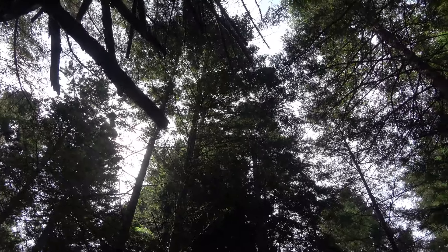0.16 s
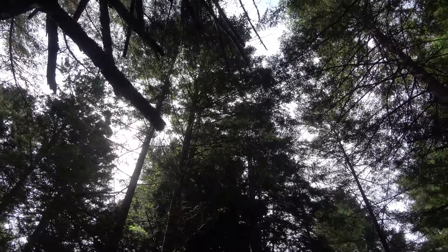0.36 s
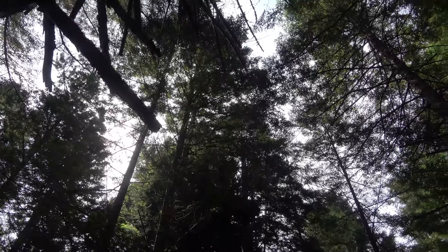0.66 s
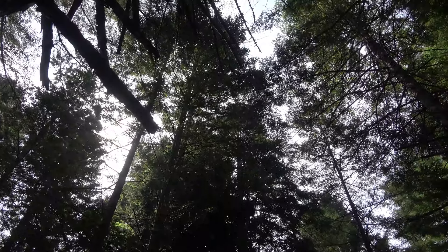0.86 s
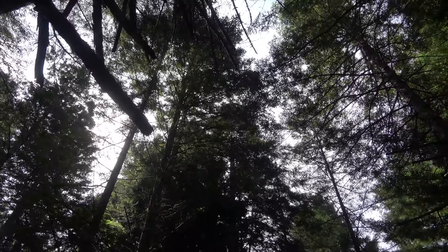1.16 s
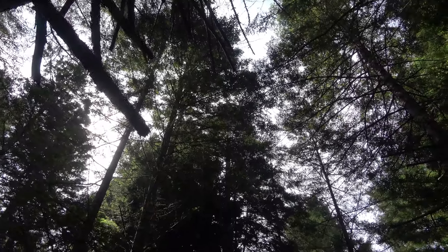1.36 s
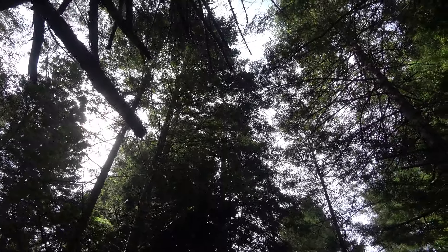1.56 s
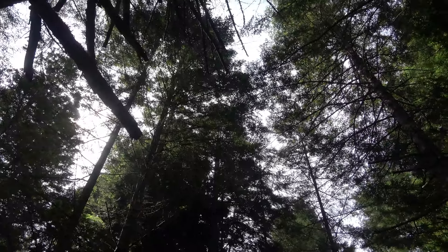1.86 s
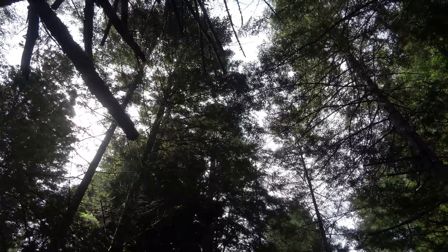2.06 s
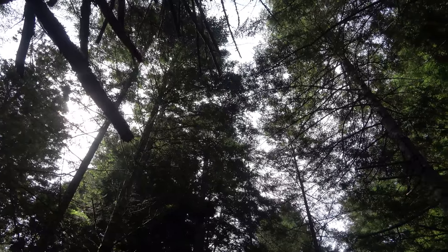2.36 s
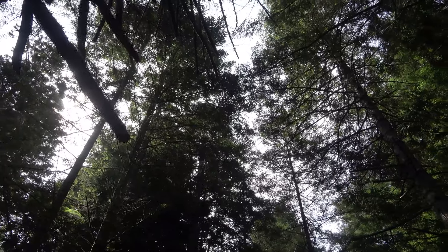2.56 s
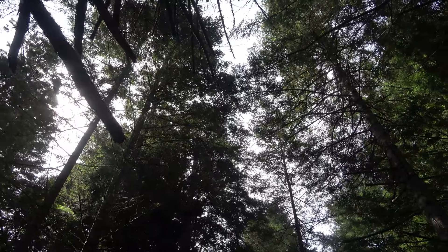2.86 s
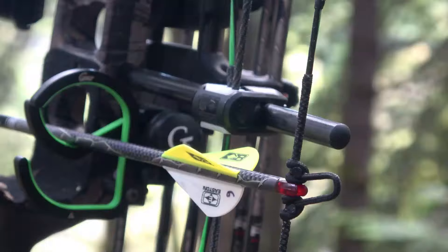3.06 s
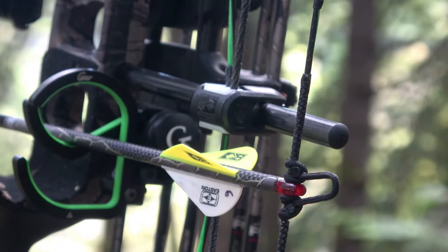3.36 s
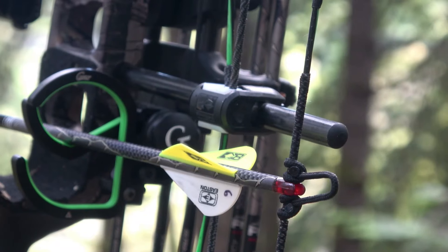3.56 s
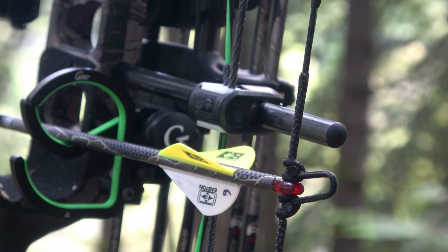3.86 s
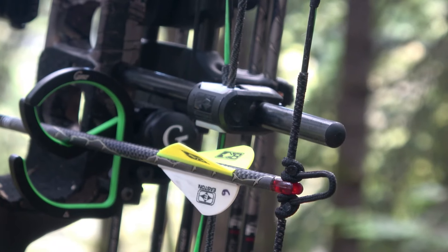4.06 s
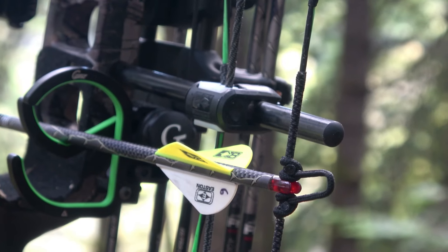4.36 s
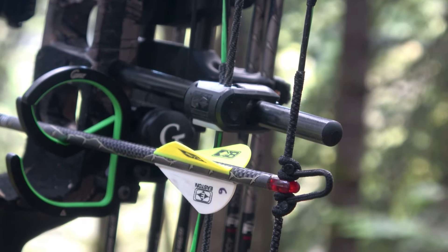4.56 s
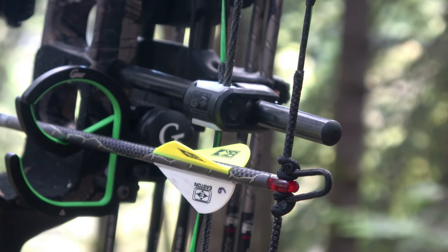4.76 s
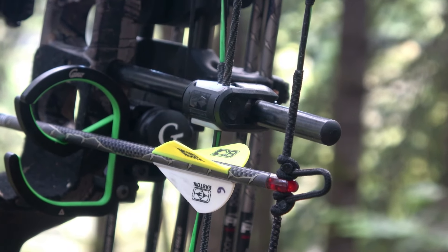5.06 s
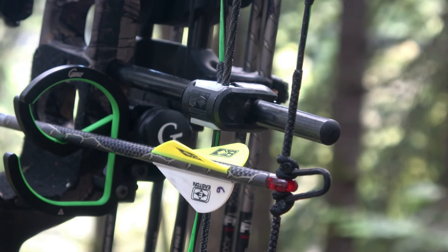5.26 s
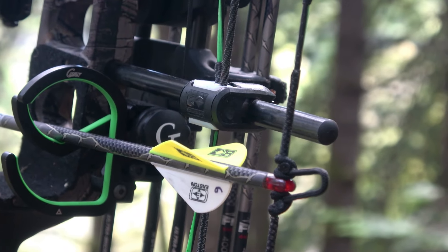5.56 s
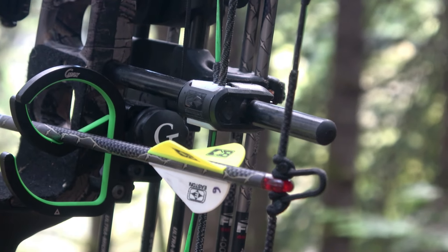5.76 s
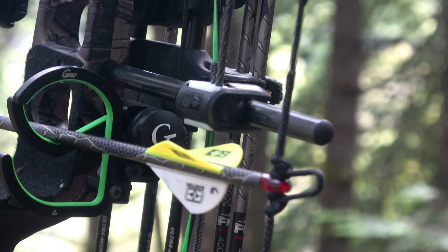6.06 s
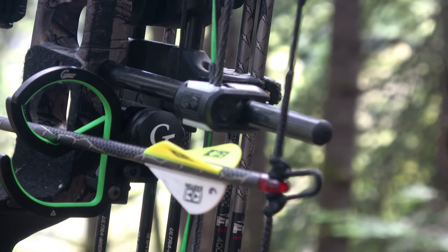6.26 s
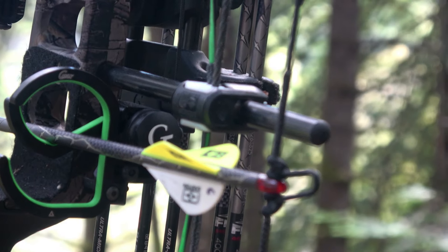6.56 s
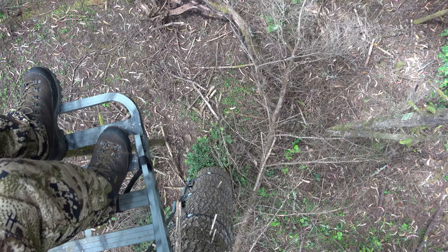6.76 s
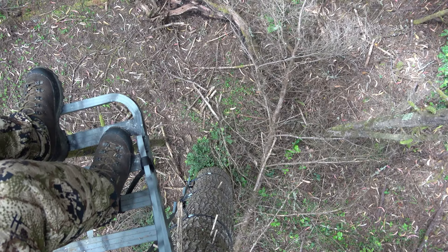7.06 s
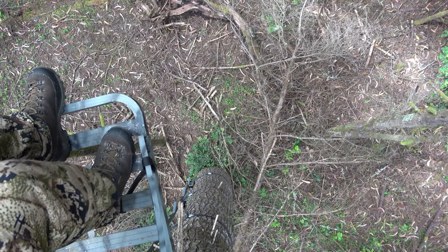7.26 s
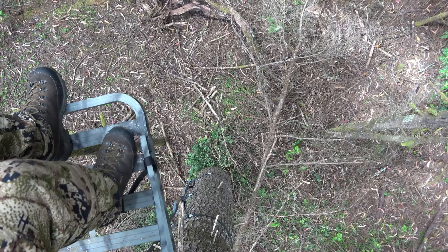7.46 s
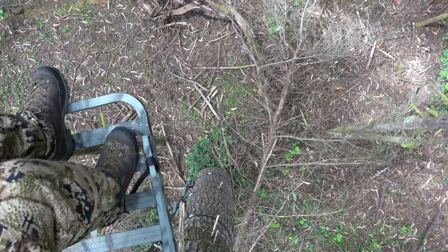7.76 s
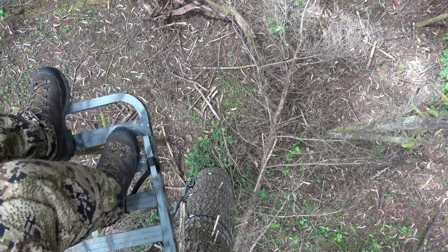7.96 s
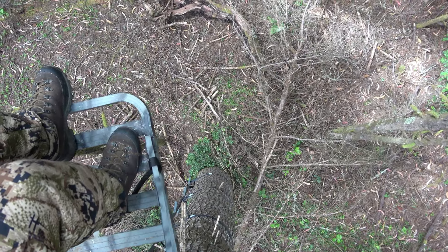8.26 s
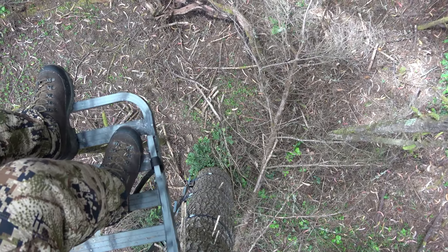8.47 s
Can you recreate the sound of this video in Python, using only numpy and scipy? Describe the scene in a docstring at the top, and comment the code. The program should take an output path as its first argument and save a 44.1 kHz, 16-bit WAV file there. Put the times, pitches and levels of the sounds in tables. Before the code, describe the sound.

Quiet forest air and a low rumble from a swaying microphone run throughout. Scattered high chirps and distant whistles give way suddenly to a small bird peeping repeatedly, with quick twitters and a few lower pips around it, all echoing lightly among the trunks. The microphone is softly bumped during the peeps. Near the end the birds cut off, leaving mostly the breeze in the conifers.

```python
"""Small birds peep, chirp, whistle and twitter in a conifer forest, heard from a tree stand.
Each call is a nearly pure syrinx tone bent in pitch, which the trunks scatter into a long tail.
Three stretches cut abruptly into one another: thin chirps and falling whistles, then a run of
arched peeps with buzzy twitters, then little but the wind rushing through the crowns.
Underneath, the microphone sways with a low rumble and is nudged now and then."""
import sys
import numpy as np
from scipy import signal
from scipy.fft import rfft, irfft
from scipy.io import wavfile
from scipy.ndimage import uniform_filter1d

SR = 44100
rng = np.random.default_rng(int(sys.argv[2]) if len(sys.argv) > 2 else 0)


def dump(signal):
    """Clip the signal to [-1, 1] and save it as 16-bit WAV at the path in sys.argv[1]."""
    limited = np.clip(np.atleast_2d(signal).T, -1, 1)
    pcm = np.round(limited * 32767).astype(np.int16)
    wavfile.write(sys.argv[1], SR, pcm)


N = 380583
TIME = np.arange(N) / SR


def from_db(db):
    """Decibels to gain."""
    return 10 ** (np.asarray(db) / 20)


def add(out, start, sound):
    """Mix a sound in at a start time in seconds; what lies outside the scene is dropped."""
    at = round(start * SR) + np.arange(len(sound))
    inside = (at >= 0) & (at < N)
    out[at[inside]] += sound[inside]


def progress(length):
    """A ramp from 0 to 1 over a note."""
    return np.linspace(0, 1, max(int(length * SR), 2))


def hump(peak_time, length):
    """An envelope that rises to 1 at its peak time and sinks again."""
    return np.cos(np.pi * np.clip((TIME - peak_time) / length, -.5, .5))


def narrow_noise(hz, width_hz):
    """Noise in one steep-sided band; rms 1."""
    freqs = np.arange(N // 2 + 1) * SR / N
    band = irfft(rfft(rng.standard_normal(N)) / (1 + (2 * (freqs - hz) / width_hz) ** 4), N)
    return band / band.std()


# Hard cuts between the stretches: (time [s], pressure step [full scale])
CUTS = [(3.0944, -0.0165), (6.6452, 0.0085)]


def clicks(settle_s=0.019):
    """A soft click on each cut: a step in pressure that leaks away."""
    out = np.zeros(N)
    for start, step in CUTS:
        add(out, start, step * np.exp(-TIME[:SR // 4] / settle_s))
    return out


def by_stretch(choices):
    """Switch to the first, second or third choice, according to the stretch."""
    return np.choose(np.searchsorted([start for start, _ in CUTS], TIME), choices)


# Forest air bed: (frequency [Hz], level in stretch 1 [dB/Hz], in stretch 2 [dB/Hz], in stretch 3 [dB/Hz])
AIR_SPECTRA = [(30.6, -81, -69.5, -74.5), (52, -83.5, -81.5, -81), (82, -86.5, -86.5, -85.5),
               (111, -83, -81.5, -85.5), (162.7, -87.5, -86, -86), (244, -92, -85.5, -88),
               (462, -97, -90.5, -92), (884, -99.5, -90.5, -90), (1250, -104.6, -96.0, -95.5),
               (1990, -112.0, -105.5, -104.8), (3440, -118.4, -113.9, -112.7),
               (5500, -120.8, -120.3, -119.4), (8660, -126.6, -126.1, -125.7),
               (16600, -127.7, -128.2, -127.8)]
# Wind in the crowns, freshest early in the second stretch: (time [s], midrange gain [dB])
CROWN_BREEZE = [(0, 0), (3, 0.4), (3.3, 1.7), (6.2, -0.53), (8.6, -.4)]


def air():
    """Wind in countless needles and far rumble, coloured anew in each stretch, over a steady hiss."""
    hz, *spectra = np.transpose(AIR_SPECTRA)
    freqs = np.maximum(np.arange(N // 2 + 1) * SR / N, 1)
    white = rfft(rng.standard_normal(N)) * np.sqrt(SR / 2)
    colours = [from_db(np.interp(np.log(freqs), np.log(hz), db)) for db in spectra]
    bed = by_stretch([irfft(white * colour, N) for colour in colours])
    crowns = signal.sosfilt(signal.butter(1, [250, 3500], "band", fs=SR, output="sos"), bed)
    breeze = from_db(np.interp(TIME, *np.transpose(CROWN_BREEZE)))
    return bed + (breeze - 1) * crowns


# Brief swells of drone and rush: (peak time [s], length [s], centre [Hz], width [Hz], level [dB])
NOISE_SWELLS = [(1.252, 0.42, 104, 60, -61), (4.312, 0.13, 250, 26, -58), (6.564, 0.24, 128, 56, -64.5),
                (6.803, 0.83, 2050, 600, -75), (7.25, 1, 727, 100, -67.5)]


def swells():
    """Bands of noise that rise and sink once."""
    return sum(from_db(db) * hump(peak_time, length) * narrow_noise(hz, width_hz)
               for peak_time, length, hz, width_hz, db in NOISE_SWELLS)


# Rumble of the swaying microphone, one entry per stretch: (level [dB])
SWAY_LEVELS = [-38.5, -44.5, -40.5]
# Nudges to the microphone mount: (peak time [s], length [s], level [dB])
MOUNT_NUDGES = [(1.223, .2, -52), (3.96, 0.115, -32.5), (4.293, .08, -39)]


def handling(shudder_hz=27):
    """The microphone sways all the time and shudders for a few cycles when nudged."""
    sway_gain = uniform_filter1d(by_stretch(from_db(SWAY_LEVELS)), size=SR // 5)
    sway = sway_gain * narrow_noise(hz=11.14, width_hz=6.7)
    shudders = sum(from_db(db) * hump(peak, length) * np.sin(2 * np.pi * shudder_hz * (TIME - peak))
                   for peak, length, db in MOUNT_NUDGES)
    return sway + shudders


def scatter(dry, t60, onset_s, echoes_per_s):
    """Echoes from trunks and boughs arrive at random and die away, or are cut off with their stretch."""
    t = np.arange(2 * SR) / SR
    arrivals = (rng.random(len(t)) < echoes_per_s / SR) * rng.standard_normal(len(t))
    build_up = 1 - np.exp(-(t / onset_s) ** 2)
    echoes = arrivals * from_db(-60 * t / t60) * build_up
    echoes /= np.sqrt(np.sum(echoes ** 2) + 1e-18)
    stretches = np.split(dry, [round(start * SR) for start, _ in CUTS])
    return np.concatenate([signal.fftconvolve(part, echoes)[:len(part)] for part in stretches])


def forest(dry, direct_db, near_db, near_t60, deep_db, deep_t60):
    """The direct call, a quick spray from the nearest boughs and a long tail from the deep wood."""
    near = scatter(dry, near_t60, onset_s=0.0037, echoes_per_s=1500)
    deep = scatter(dry, deep_t60, onset_s=0.034, echoes_per_s=2500)
    return from_db(direct_db) * dry + from_db(near_db) * near + from_db(deep_db) * deep


def whistle(hz, taper):
    """A syrinx sings a nearly pure tone that swells and fades; more taper gives softer ends."""
    envelope = np.abs(np.sin(np.linspace(0, np.pi, len(hz)))) ** taper
    return envelope * np.sin(2 * np.pi * np.cumsum(hz) / SR)


def glides(notes, bend, taper, waver, db_per_octave, flutter_db):
    """Trembling whistles that share one bend: (start, end) in semitones from the middle pitch."""
    out = np.zeros(N)
    tremble, flutter = narrow_noise(100, 200), narrow_noise(38, 70)
    ratios = 2 ** (np.array([bend[0], 0, bend[1]]) / 12)
    arc = np.polyfit([0, .5, 1], ratios, 2)
    for start, length, middle_hz, db in notes:
        u = progress(length)
        at = (int(start * SR) + np.arange(len(u))) % N
        pitch = np.polyval(arc, u + u ** 3 * (1 - u))  # lingers on the end of the bend
        level_db = db + db_per_octave * np.log2(pitch) + flutter_db * flutter[at]
        hz = middle_hz * pitch * (1 + waver * tremble[at])
        add(out, start, from_db(level_db) * whistle(hz, taper))
    return out


# High calls of distant birds: (time [s], length [s], middle pitch [Hz], level [dB])
FAR_NOTES = [(0, .12, 7800, -77), (.16, .15, 5410, -80), (1.25, .15, 7260, -79), (1.66, 0.17, 5560, -79),
             (1.88, 0.14, 5400, -79), (2.01, .04, 6370, -79), (2.54, 0.042, 6250, -71),
             (2.68, .088, 5400, -82), (3.86, 0.038, 7040, -76), (5.85, .052, 7840, -81),
             (7.2, 0.086, 5100, -78), (8.55, .046, 8400, -79)]


def far_calls():
    """Single high whistles from deep in the wood, each sagging a little."""
    return glides(FAR_NOTES, bend=(.5, -0.54), taper=.3, waver=.014, db_per_octave=0, flutter_db=2)


# Phrases of a low, distant bird: (time [s], level [dB])
PHRASE_CUES = [(.68, -69.5), (2.378, -69.5)]


def far_phrases(note_s=.085, step_s=.223, middle_hz=2498, accent_db=2):
    """A far bird sings three evenly spaced rising notes, accenting the middle one."""
    notes = [(start + k * step_s, note_s, middle_hz, db + accent_db * (k == 1))
             for start, db in PHRASE_CUES for k in range(3)]
    return glides(notes, bend=(-1.1, 0.11), taper=.3, waver=0.015, db_per_octave=-3, flutter_db=1.7)


# Answering pips: (time [s], level [dB])
PIP_CUES = [(4.117, -62), (4.34, -66), (4.597, -66), (5.956, -65.5), (6.175, -65), (6.437, -63)]


def pips(note_s=.03, middle_hz=2596):
    """A lower bird answers with one short arched pip at a time."""
    notes = [(start, note_s, middle_hz, db) for start, db in PIP_CUES]
    return glides(notes, bend=(-0.99, -1.9), taper=.4, waver=0.0048, db_per_octave=9, flutter_db=3.0)


# Falling whistles: (time [s], level [dB])
SLUR_CUES = [(-.02, -72), (.797, -72), (1.576, -68.5), (2.322, -71.5)]


def slurs(note_s=.1, middle_hz=4580):
    """One bird repeats the same long fall, fading as it sinks."""
    notes = [(start, note_s, middle_hz, db) for start, db in SLUR_CUES]
    return glides(notes, bend=(4.3, -3), taper=0.45, waver=0.0072, db_per_octave=10.5, flutter_db=2)


# Chirps that dip and rise again: (time [s], length [s], middle pitch [Hz], level [dB])
CHIRP_NOTES = [(.080, 0.032, 5650, -77), (.493, 0.073, 6290, -73), (1.408, 0.048, 6530, -66.5),
               (2.226, 0.0315, 6740, -56), (3.022, 0.043, 6400, -68.5)]
# Very high hooked ticks: (time [s], length [s], middle pitch [Hz], level [dB])
TICK_NOTES = [(.632, 0.024, 8950, -73.5), (.783, .044, 10050, -79), (.940, .048, 9300, -80),
              (1.012, .024, 8140, -72), (1.025, 0.022, 9100, -75)]
# Thin, nearly level whistles: (time [s], length [s], middle pitch [Hz], level [dB])
THIN_NOTES = [(1.03, 0.083, 6600, -85), (5.598, 0.047, 7800, -83), (5.63, .185, 7480, -83.5),
              (6.312, 0.083, 7500, -73)]


def near_calls():
    """Chirps, ticks and thin whistles: clean short notes, each kind with its own bend."""
    kinds = [(CHIRP_NOTES, (1.4, 1.8)), (TICK_NOTES, (-.2, -1.6)), (THIN_NOTES, (.35, 0))]
    return sum(glides(notes, bend, taper=0.45, waver=0.005, db_per_octave=10, flutter_db=3.5)
               for notes, bend in kinds)


# Buzzy twitters: (time [s], length [s], middle pitch [Hz], pitch swing [Hz], level [dB])
TWITTER_NOTES = [(3.959, 0.026, 8560, 550, -67.5), (4.328, 0.069, 6880, 1390, -68),
                 (4.419, 0.074, 6930, 1490, -68.5), (4.553, .068, 6800, 1300, -69),
                 (5.096, .13, 5500, 600, -81), (6.099, 0.26, 6040, 1060, -79.5),
                 (6.331, .063, 6270, 1040, -65), (6.379, .057, 6770, 330, -64),
                 (6.42, .21, 5800, 800, -71.5), (6.516, 0.038, 6880, 350, -62.5),
                 (6.554, .059, 6170, 450, -65.5)]


def twitters(sweeps_per_s=60, sag_hz=240, pace_spread=0.239, swing_spread=0.37):
    """The pitch is thrown rapidly up and down within one sagging note, unevenly in pace and reach."""
    out = np.zeros(N)
    pace, reach = narrow_noise(30, 60), narrow_noise(44.4, 83)
    for start, length, middle_hz, swing_hz, db in TWITTER_NOTES:
        u = progress(length)
        at = (int(start * SR) + np.arange(len(u))) % N
        cycles = np.cumsum(sweeps_per_s * (1 + pace_spread * pace[at])) / SR
        triangle = signal.sawtooth(2 * np.pi * cycles, .5)
        swing = swing_hz * (1 + swing_spread * reach[at]) * triangle
        add(out, start, from_db(db) * whistle(middle_hz + sag_hz * (.5 - u) + swing, taper=0.15))
    return out


# The lead bird's run of arched peeps: (time [s], length [s], top pitch [Hz], level [dB])
PEEP_NOTES = [(3.116, 0.054, 4730, -62.5), (3.25, 0.067, 4640, -61), (3.711, .048, 4625, -60.5),
              (3.91, .049, 4600, -59), (4.118, 0.054, 4575, -60), (4.323, 0.054, 4570, -60),
              (4.465, 0.06, 4576, -58), (4.656, 0.063, 4730, -60.5), (4.773, 0.079, 4734, -59),
              (5.077, 0.051, 4590, -62), (5.375, 0.053, 4450, -58.5), (5.561, 0.056, 4555, -60),
              (5.823, 0.057, 4653, -60), (6.093, 0.052, 4520, -60.5), (6.342, 0.062, 4460, -59.5)]


def peeps(ordinary_s=.05, db_per_octave=28, flutter_db=1.0,
          flick_hz=(4900, 7400), flick_s=.010, flick_lead_s=.003):
    """Each peep scoops quickly up to its top and drops away, led in by a faint upward flick."""
    out = np.zeros(N)
    flick = whistle(np.interp(progress(flick_s), [0, 1], flick_hz), taper=0.54)
    for start, length, top_hz, db in PEEP_NOTES:
        u = progress(length)
        scoop = .31 * np.exp(-u * length / .0055)
        drop = .23 * (np.maximum(u - .45, 0) / .55) ** 1.7
        pitch = 1 - (scoop + drop) * (ordinary_s / length) ** .8  # held notes arch less
        level_db = db + db_per_octave * np.log2(pitch)  # loudest at the top of the arch
        add(out, start, from_db(level_db) * whistle(top_hz * pitch, taper=0.75))
        # the flick grows along the run and fades on held notes
        into_run_s, held_s = start - PEEP_NOTES[0][0], max(length - ordinary_s, 0)
        flick_db = db - 21.5 + 3 * into_run_s - 500 * held_s
        add(out, start - flick_lead_s, from_db(flick_db) * flick)
    return out * from_db(flutter_db * narrow_noise(35, 70))


def scene():
    """The mono mix, birds over the air bed: near ones are mostly direct, far ones mostly scatter."""
    background = air() + swells() + handling() + clicks()
    peep, twitter, chirp, slur = peeps(), twitters(), near_calls(), slurs()
    far, pip, phrase = far_calls(), pips(), far_phrases()
    birds = forest(peep, direct_db=0, near_db=-6.5, near_t60=0.35, deep_db=-10, deep_t60=1.2)
    birds += forest(chirp, direct_db=0, near_db=-2.5, near_t60=0.27, deep_db=-9, deep_t60=0.9)
    birds += forest(slur, direct_db=-3, near_db=-5.5, near_t60=0.26, deep_db=-9.5, deep_t60=1.2)
    birds += forest(twitter, direct_db=-8.5, near_db=-5.5, near_t60=0.39, deep_db=-11, deep_t60=1.0)
    birds += forest(pip, direct_db=-2.5, near_db=-7, near_t60=.3, deep_db=-7, deep_t60=1.0)
    birds += forest(phrase, direct_db=-11.5, near_db=-7.5, near_t60=.45, deep_db=-8, deep_t60=1.8)
    birds += forest(far, direct_db=-9.5, near_db=-9, near_t60=0.23, deep_db=-8, deep_t60=2.7)
    return (birds + background)[None]


def record(dry):
    """A steep low-pass takes off the very top."""
    cutoff_hz = 15750
    return signal.sosfilt(signal.ellip(12, .1, 80, cutoff_hz, fs=SR, output="sos"), dry)


dry = scene()
out = record(dry)
dump(out)
```